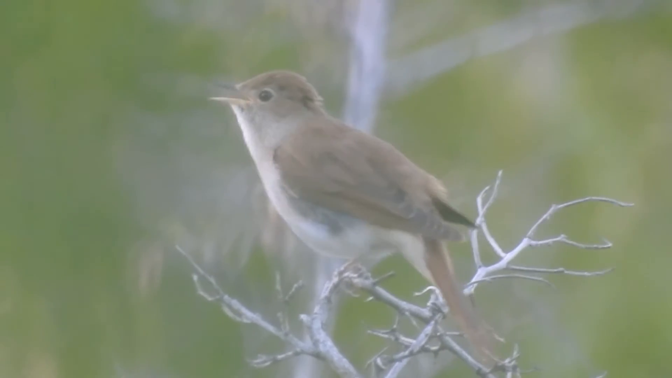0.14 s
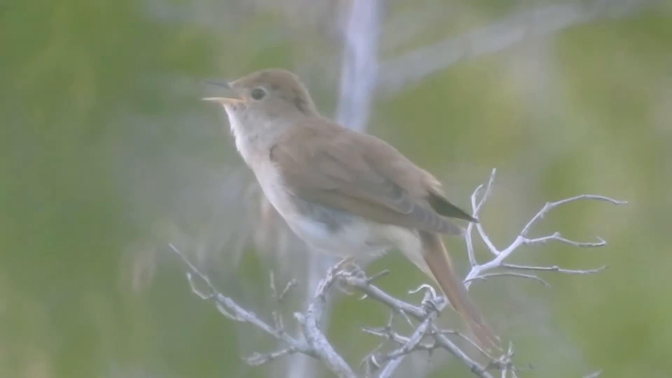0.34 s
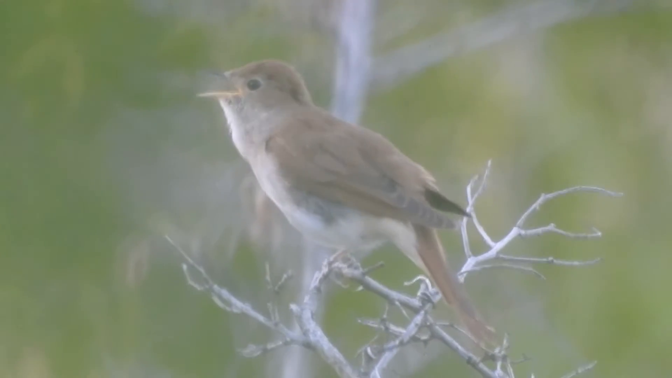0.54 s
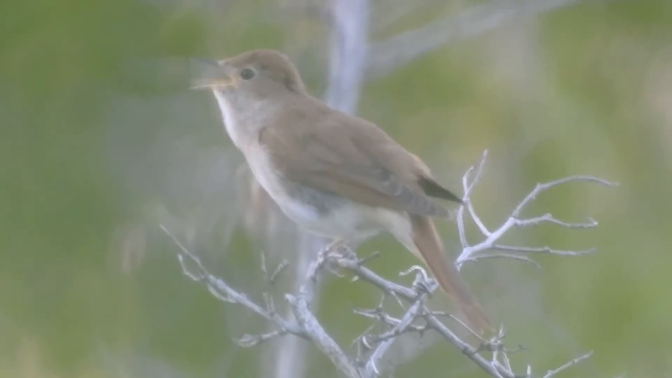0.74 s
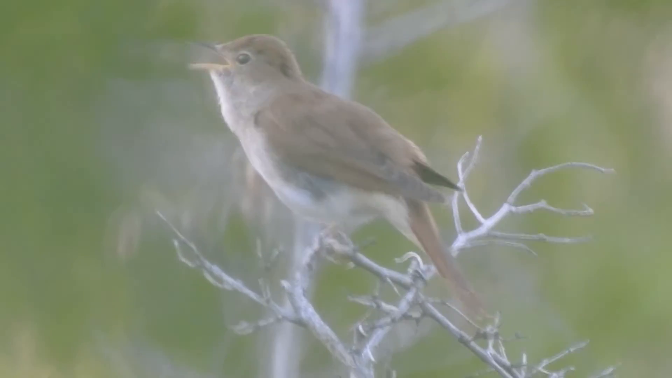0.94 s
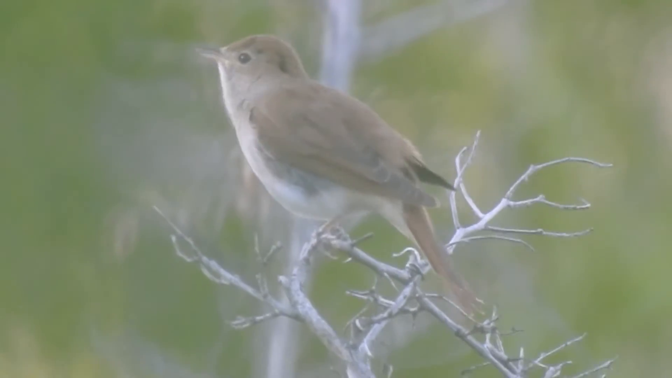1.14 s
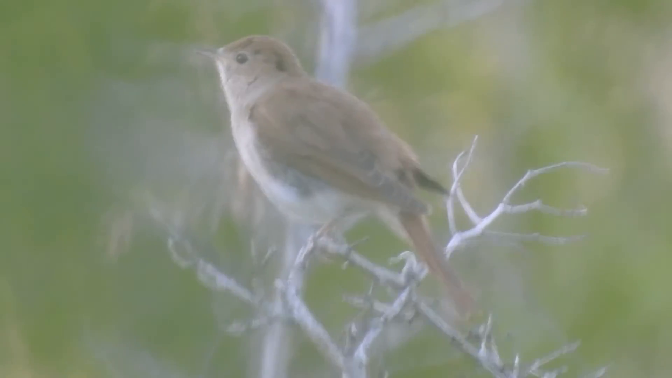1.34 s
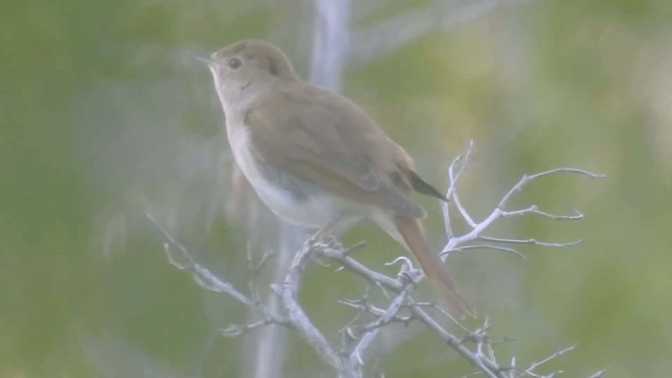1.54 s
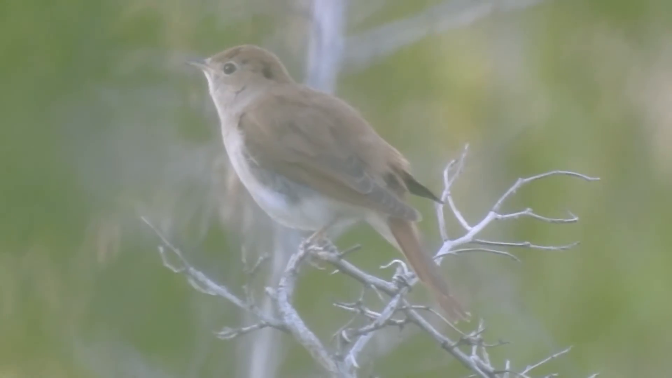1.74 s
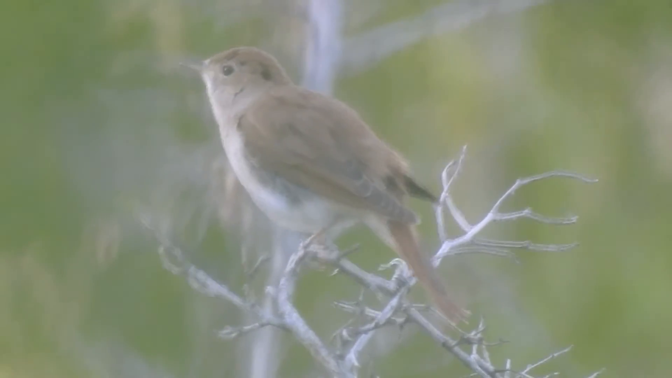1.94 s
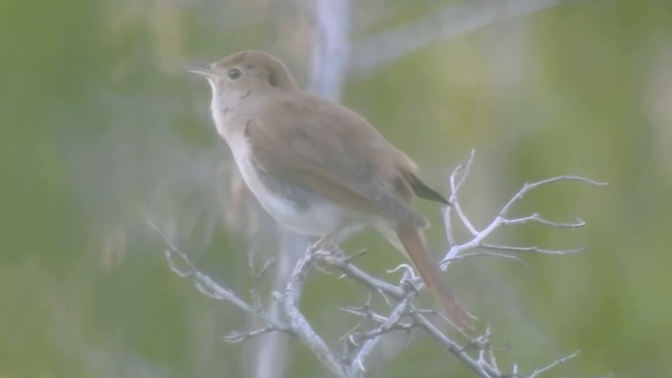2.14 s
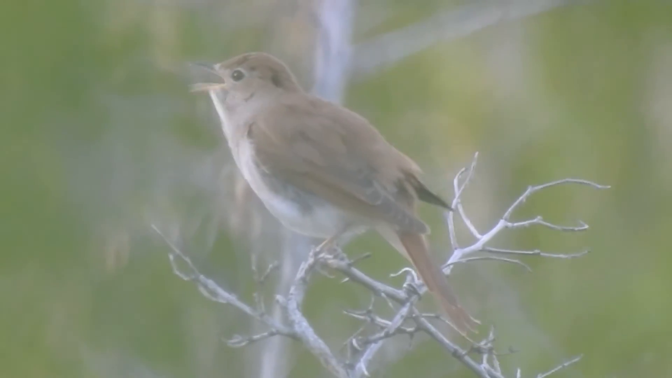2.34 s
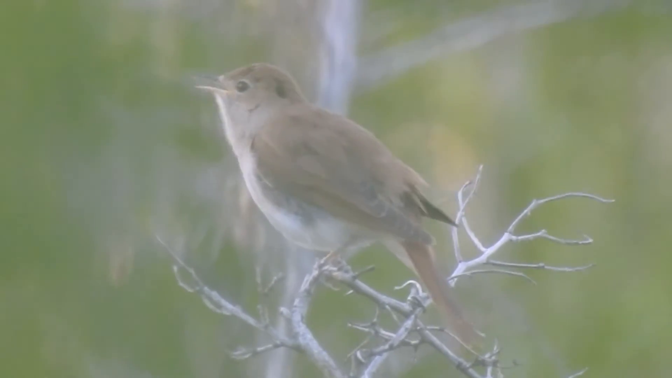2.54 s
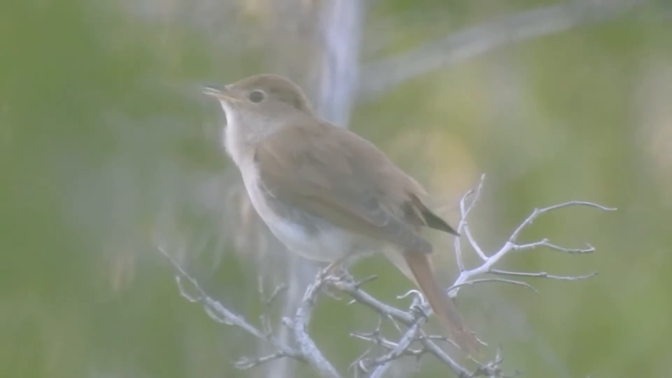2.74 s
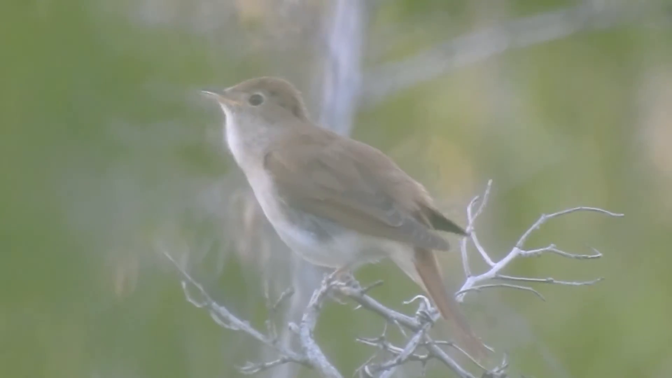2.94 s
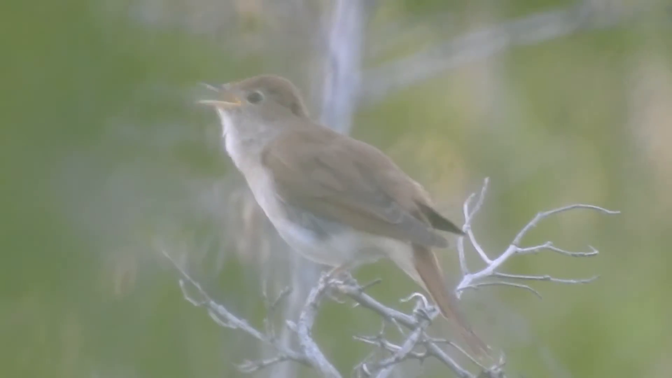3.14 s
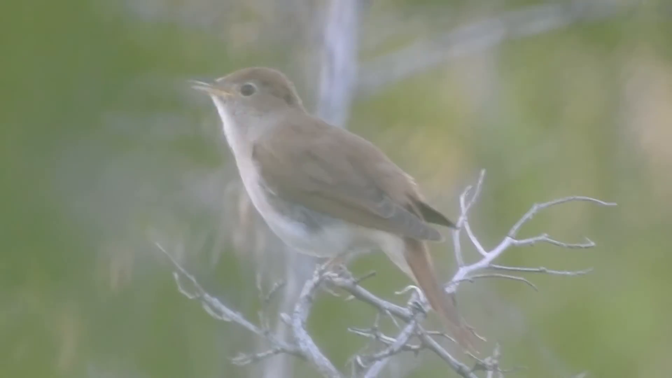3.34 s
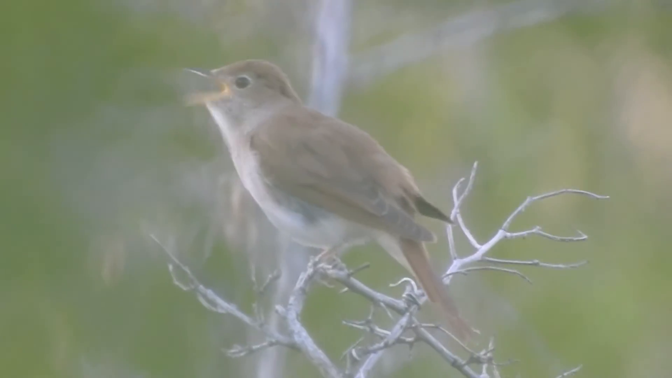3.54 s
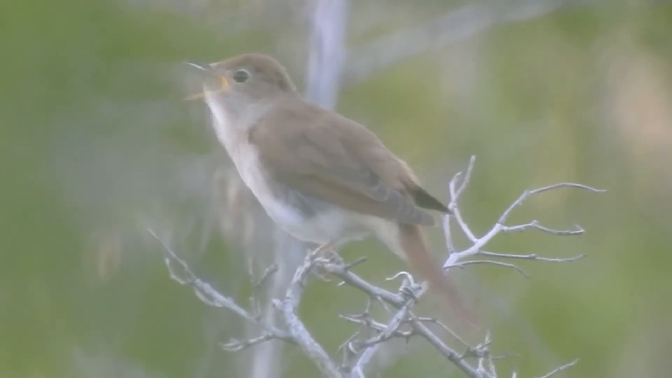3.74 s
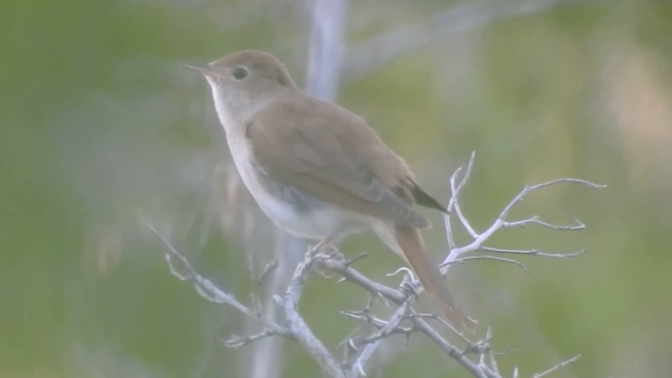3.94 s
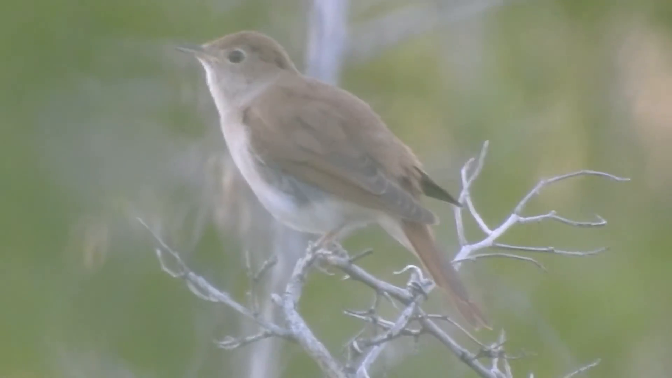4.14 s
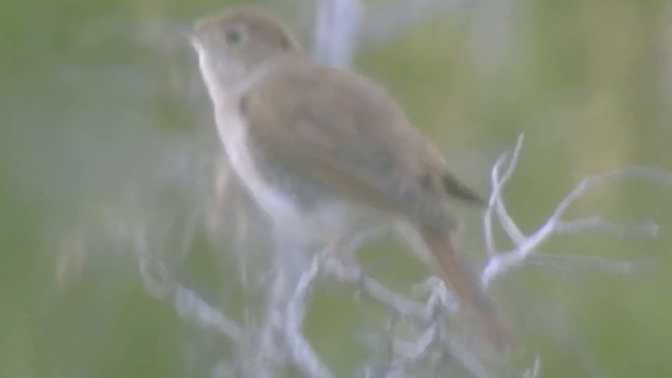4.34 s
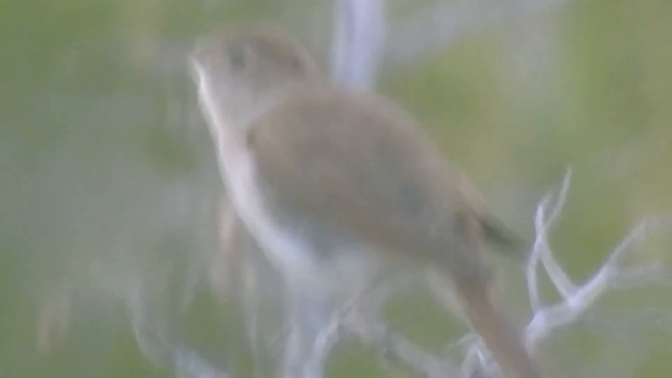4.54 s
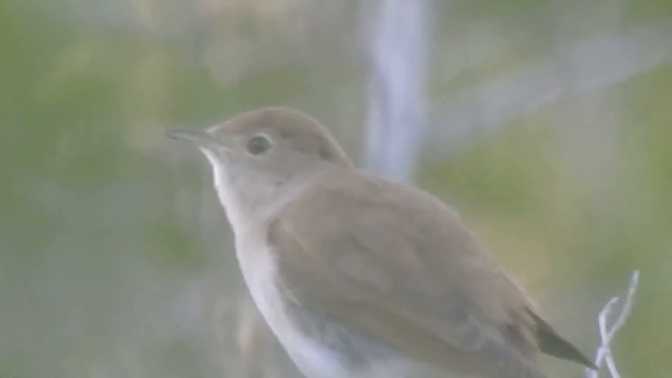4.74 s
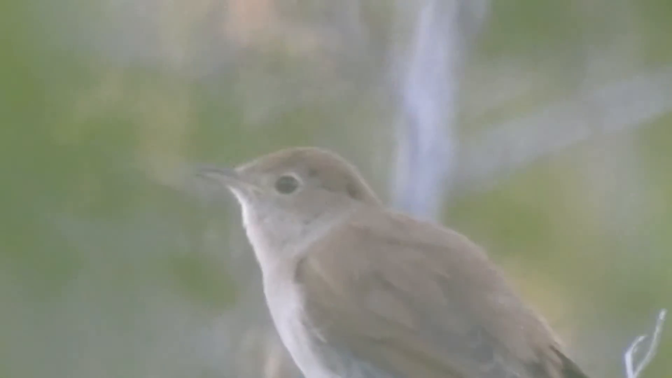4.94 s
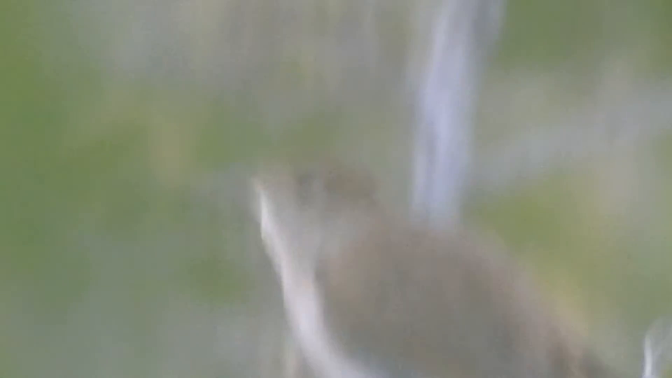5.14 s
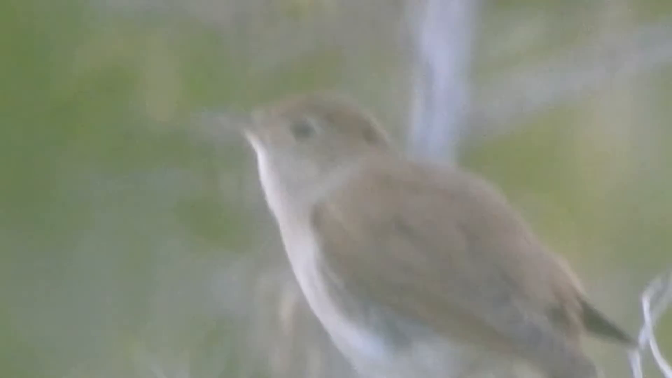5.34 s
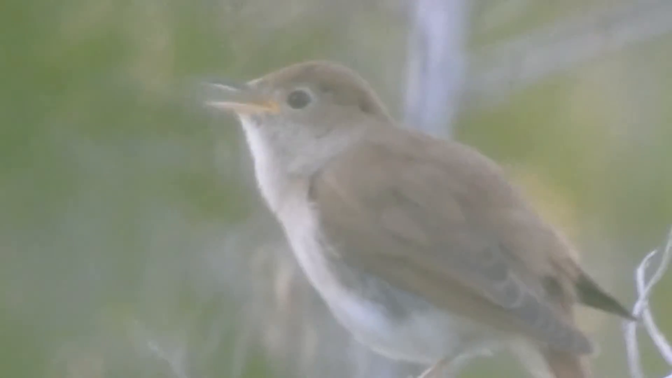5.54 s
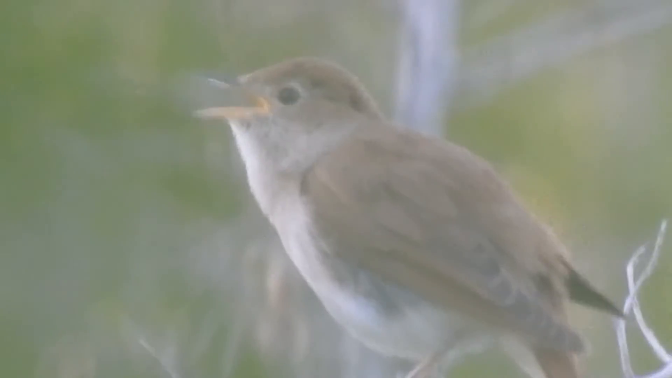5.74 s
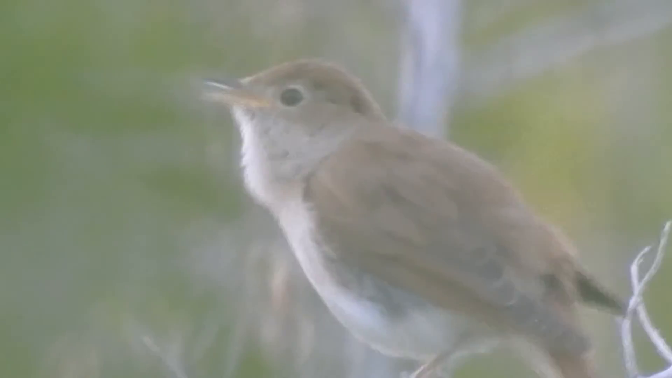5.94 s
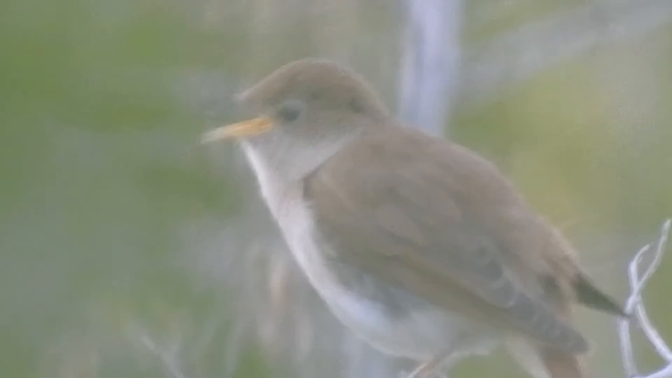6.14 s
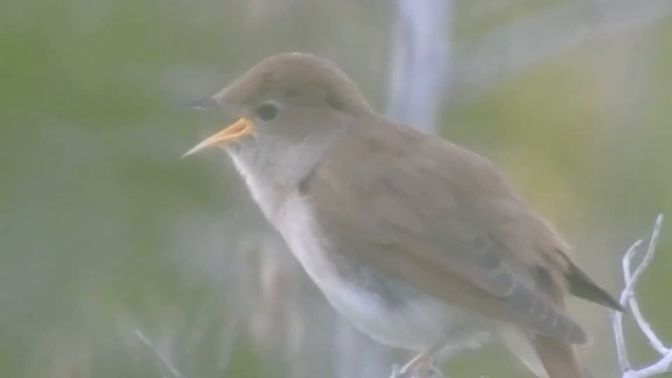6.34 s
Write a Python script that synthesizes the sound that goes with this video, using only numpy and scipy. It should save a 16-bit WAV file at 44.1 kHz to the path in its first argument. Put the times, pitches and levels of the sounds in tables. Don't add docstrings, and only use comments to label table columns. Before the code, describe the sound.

A nightingale sings close by at a wood's edge, dry and bright with a short leafy reverberation. At 0.05-0.12 s come rough high ticks, then a low rising chirp near 0.2. Four loud whip cracks fall at about 0.34, 0.57, 0.79 and 1.02 s, each followed by four quick, fading, descending trill notes. A raspy high flick sounds at 1.2; then a lull with pulsing crickets, soft snaps and, from 2.15 to 2.75, a faint distant repeated figure. Sharp high notes return at 2.4-2.8, two low soft whistles at 2.9-3.05, swooping chirps at 3.13-3.45, a rapid two-toned run at 3.52-3.6, a high downward glide at 3.65, and bright buzzy notes at 3.87-4.0. Afterwards it is quiet: cricket bouts, tiny snaps at 4.6 and 5.1, far fluttering whistles, then soft steady whistles at 5.6-6.0 and louder from 6.2 to the end. A low outdoor rumble and faint airy hiss persist.

```python
import sys
import numpy as np
from scipy import signal
from scipy.fft import rfft, irfft, next_fast_len
from scipy.io import wavfile
from scipy.ndimage import uniform_filter1d, map_coordinates

SR = 44100
rng = np.random.default_rng(int(sys.argv[2]) if len(sys.argv) > 2 else 0)


def store_pcm(level_fs):
    pcm = np.round(np.clip(level_fs, -1, 1) * 32767).astype(np.int16)
    wavfile.write(sys.argv[1], SR, np.atleast_2d(pcm).T)


def gain_from_db(level_db):
    decades = np.asarray(level_db, float) / 20
    return 10 ** decades


N = 285768


def unit(x):
    return x / np.sqrt(np.mean(x ** 2) + 1e-20)


def along(points, hz):
    f, v = np.transpose(points)
    return np.interp(np.log(hz + 1), np.log(f + 1), v)


def wobble(n, rate):
    knots = rng.standard_normal(int(n * rate / SR) + 4)
    return map_coordinates(knots, [np.arange(n) * rate / SR])


def filtered(x, response):
    m = next_fast_len(N + 8192)
    return irfft(rfft(x, m) * response(np.fft.rfftfreq(m, 1 / SR)), m)[..., :N]


def leaning(x, lean):
    return filtered(x, lambda hz: gain_from_db(along(lean, hz) * [[0.5], [-0.5]]))


def add(track, s, sound):
    part = track[round(s * SR):][:len(sound)]
    part += sound[:len(part)]


def tone(hz):
    return np.sin(2 * np.pi * np.cumsum(hz) / SR)


def syrinx(hz, overtone_db):
    lag = min(len(hz) // 4, round(0.009 * SR))
    late = np.pad(hz, (lag, 0), mode="edge")[:len(hz)]
    passed = gain_from_db(overtone_db - 3.3 * ((late - 3100) / 500) ** 2)
    second, third = tone(2 * late), tone(3 * late)
    return tone(hz) + passed * (second + gain_from_db(-17.5) * third)


def chirps(rows, lean=0.93):
    track = np.zeros(N)
    for s, ms, start, middle, end, db in rows:
        u = np.linspace(0, 1, round(ms * SR / 1000))
        slope = 4 * middle - 3 * start - end
        curve = 2 * (start + end - 2 * middle)
        hz = start + slope * u + curve * u * u
        point = 0.48 + 3.1 / ms
        puff = np.abs(np.sin(np.pi * u ** lean)) ** point
        add(track, s, gain_from_db(db) * puff * tone(hz))
    return track


def whistles(notes, overtone_db, waver_db, waver_rate, round_s, shake_hz=0):
    track = np.zeros(N)
    for note in notes:
        s, hz, db = np.transpose(note)
        t = np.arange(s[0], s[-1], 1 / SR)
        pitch = uniform_filter1d(np.interp(t, s, hz), int(round_s * SR) + 1, mode="nearest")
        pitch = pitch + shake_hz * wobble(len(t), waver_rate)
        edges = np.clip(np.minimum(t - s[0], s[-1] - t) / 0.0018, 0, 1)
        waver = gain_from_db(waver_db * wobble(len(t), waver_rate))
        size = np.interp(t, s, gain_from_db(db)) * edges * waver
        add(track, s[0], size * syrinx(pitch, overtone_db))
    return track


def struck(shapes, beat, times):
    return [(s + ms / 1000, *shape, db + more_db)
            for s, more_db in times for shape, (ms, db) in zip(shapes, beat)]


def bent(rows):
    return [(s, ms, start, start + 0.583 * (end - start), end, db) for s, ms, start, end, db in rows]


def again(shape, times):
    return [[(s + ms / 1000, hz, db) for ms, hz, db in shape] for s in times]


# f/Hz, level per Hz/dB
AIR_SPECTRUM = [(28, -29), (45, -3.5), (70, 4), (125, -4.5), (200, 1), (410, -7.5), (650, -6.5), (800, -12),
                (2700, -18.5), (4500, -16), (6560, -14.5), (8140, -28), (13600, -37), (15600, -40.5)]
# f/Hz, correlation [1]
AIR_COHERENCE = [(35, 0.95), (70, 0.76), (180, 0.88), (550, 0.92), (1650, 0.85), (4970, 0.068),
                 (15000, 0.08)]
# f/Hz, left minus right level/dB
AIR_LEAN = [(60, -1), (2000, -3), (8000, -1), (15000, 0.5)]


def air():
    z = signal.stft(rng.standard_normal((2, N)), nperseg=512)[2]
    patches = uniform_filter1d(rng.standard_normal(z.shape[1:]), 6, 0)
    patches = uniform_filter1d(patches, 14, 1)
    pair = signal.istft(z * gain_from_db(1.5 * unit(patches)), nperseg=512)[1][:, :N]

    def mid_side(hz):
        turn = np.arccos(np.clip(along(AIR_COHERENCE, hz), -1, 1)) / 2
        return gain_from_db(along(AIR_SPECTRUM, hz)) * [np.cos(turn), np.sin(turn)]

    mid, side = filtered(pair, mid_side)
    return gain_from_db(-44.5) * unit(leaning(np.array([mid + side, mid - side]), AIR_LEAN))


STROKE_FALL = (1.028, 0.925)

# t/s, centre f/Hz, level/dB
CHORUS_SWELL = [(0, 4420, -49), (1.25, 4440, -51.5), (1.4, 4525, -39.5), (1.52, 4640, -54),
                (1.65, 4410, -46.5), (1.78, 4390, -48), (1.85, 4560, -50), (1.95, 4600, -43),
                (2.08, 4320, -48.5), (2.2, 4500, -55.5), (3.6, 4520, -50), (4.1, 4500, -49.5),
                (4.5, 4550, -57.5), (5.5, 4524, -54.5), (6.48, 4600, -53)]


def cricket_chorus():
    high, low = STROKE_FALL
    when, centre_hz, level_db = np.transpose(CHORUS_SWELL)
    sides = []
    for luck in rng.random((2, 1500, 4)):
        starts = luck[:, 0] * (N / SR - 0.03)
        swell_db = np.interp(starts, when, level_db) + 5 * (luck[:, 1] - 0.8)
        pitch = np.interp(starts, when, centre_hz) + 280 * (luck[:, 2] - luck[:, 3])
        strokes = zip(starts, pitch, swell_db)
        sides.append(chirps([(s, 18, high * hz, hz, low * hz, db) for s, hz, db in strokes]))
    return np.array(sides) * gain_from_db([[-1.1], [1.1]])


# t/s, f/Hz, peak level/dB
WARBLES = [
    [(5.725, 2800, -49), (5.75, 2865, -45), (5.82, 2686, -50), (5.9, 2555, -45), (5.94, 2458, -39),
     (5.99, 2367, -45.5)],
    [(5.73, 2450, -49), (5.79, 2423, -40), (5.85, 2306, -37), (5.9, 2240, -60)],
    [(6.36, 1792, -54), (6.478, 1874, -47.5)],
    [(6.345, 2150, -54), (6.42, 2113, -48), (6.478, 2150, -52)],
    [(6.222, 2120, -49), (6.255, 2250, -57)],
    [(6.36, 1365, -61), (6.478, 1510, -55)],
    [(5.815, 4710, -51), (5.86, 4390, -53), (5.96, 4490, -49.5)],
    [(0.004, 3150, -56), (0.05, 3200, -53), (0.13, 3150, -55)],
    [(1.47, 2070, -56), (1.56, 2050, -62)],
    [(1.55, 2485, -54.5), (1.65, 2410, -59)],
    [(1.94, 1950, -59.5), (2.09, 2130, -65)],
]


def far_warbles():
    paths = [whistles(WARBLES, -60, waver_db=5, waver_rate=110, round_s=0.01, shake_hz=90) for _ in range(2)]
    return 0.71 * (paths[0] + paths[1])


# t/s, f/Hz, peak level/dB
THREADS = [
    [(0.02, 2450, -59), (0.17, 2464, -58)],
    [(2.235, 3130, -57), (2.33, 3130, -59), (2.41, 3040, -58)],
    [(2.25, 2610, -57), (2.55, 2600, -58), (2.86, 2600, -59)],
    [(5.67, 4970, -53), (5.8, 4900, -58), (5.9, 4920, -55)],
    [(5.695, 2284, -49), (5.73, 2164, -51), (5.79, 2034, -49)],
    [(5.85, 1680, -59), (5.92, 1680, -55.5)],
    [(6.235, 1690, -52), (6.33, 1770, -53), (6.4, 1800, -54)],
    [(6.35, 3090, -58), (6.4, 3090, -53), (6.478, 3080, -52)],
    [(5.255, 2850, -52), (5.29, 2900, -53), (5.33, 2850, -58)],
    [(4.0, 2950, -50), (4.06, 2500, -52)],
]


def distant_threads():
    return whistles(THREADS, -60, waver_db=5, waver_rate=70, round_s=0.01, shake_hz=35)


# t/s, length/ms, centre f/Hz, pulse rate/Hz, peak level/dB
TICKS = [
    (0.045, 5.6, 5270, 1240, -18),
    (0.07, 5.3, 6540, 1100, -22),
    (0.0939, 7.2, 6270, 780, -14.5),
    (0.121, 5.8, 6220, 930, -17.5),
]


def ticks():
    track = np.zeros(N)
    for s, ms, hz, rate, db in TICKS:
        t = np.arange(round(ms * SR / 1000)) / SR
        pulses = np.abs(np.sin(np.pi * rate * t)) ** 2.1 * gain_from_db(2.3 * wobble(len(t), 1460))
        puff = np.abs(np.sin(np.pi * (t / t[-1]) ** 0.31))
        add(track, s, gain_from_db(db) * puff * pulses * tone(hz + 800 * wobble(len(t), 990)))
    return filtered(track, lambda hz: 1 / (1 + (hz / 7900) ** 30) / (1 + (4000 / (hz + 1)) ** 12))


# t/s, length/ms, start f/Hz, end f/Hz, peak level/dB
FLICKS = [(1.2044, 21, 3370, 4140, -43.5), (1.2117, 39, 2750, 3190, -39), (1.2189, 17.5, 6060, 7550, -23),
          (1.2199, 34, 5320, 6180, -25.5), (1.223, 23, 3830, 4930, -34), (1.239, 25.5, 4800, 5430, -26),
          (1.2366, 17, 6150, 6950, -31.5), (2.4812, 5.1, 3770, 3810, -27), (2.4856, 9.1, 5980, 3420, -28),
          (3.1244, 6.1, 3200, 4200, -24), (3.1312, 10.5, 4050, 6330, -18.5), (3.41, 10, 3670, 4000, -27),
          (3.4151, 7.5, 5270, 6250, -28), (3.4173, 13, 4300, 5760, -27.5), (3.4206, 11.6, 3670, 4120, -29),
          (3.8781, 7, 3980, 4760, -21), (3.9679, 6.6, 3380, 3970, -31), (3.952, 12, 2900, 3100, -35),
          (3.9835, 6, 4300, 5600, -23), (0.06, 4.7, 3900, 3200, -38), (0.085, 5, 3900, 3100, -40),
          (0.112, 5.5, 3900, 3200, -41), (0.522, 5, 4600, 3900, -37), (0.531, 5, 4600, 3900, -37),
          (0.54, 5, 4520, 3910, -38), (3.9815, 6.8, 3660, 5100, -26.5), (3.982, 9.1, 4990, 7500, -16),
          (3.988, 9.4, 7500, 8560, -36), (3.9945, 5.3, 6000, 6200, -30), (3.989, 4, 6000, 6200, -28),
          (3.866, 4, 3500, 3880, -35)]


def flicks():
    return chirps(bent(FLICKS)) * gain_from_db(2.2 * wobble(N, 600))


# t/s, length/ms, start f/Hz, end f/Hz, peak level/dB
FAR_NOTES = [(6.6, 18, 4370, 4830, -41), (5.643, 33, 5140, 4820, -41.5), (5.915, 27, 5350, 4500, -41.5),
             (4.9, 19, 4500, 4420, -44), (5.893, 30, 5850, 6100, -47), (5.912, 12, 5400, 5000, -47),
             (0.186, 6.5, 4400, 3750, -36), (0.194, 7.9, 4000, 3660, -35), (0.189, 6.2, 3150, 3100, -35),
             (0.13, 24, 4000, 4420, -40), (2.88, 20, 3250, 3150, -46.5), (1.955, 28, 3900, 3800, -49.5),
             (0.298, 10, 2900, 3050, -35), (6.086, 29, 4700, 5070, -37.5), (6.315, 36, 5110, 5370, -40.5),
             (6.34, 24, 5350, 4580, -33.5), (6.341, 14, 2100, 1930, -39), (6.37, 14, 2180, 2060, -34),
             (6.398, 14, 2050, 1910, -36.5), (5.9, 15, 2400, 2010, -35)]


def far_notes():
    return chirps(bent(FAR_NOTES))


# t/s, f/Hz, peak level/dB
RISES = [
    [(0.164, 3880, -37), (0.175, 4320, -37), (0.184, 4460, -27), (0.19, 4400, -40)],
    [(0.181, 2170, -25), (0.19, 2010, -23.5), (0.203, 1798, -37), (0.22, 2310, -23), (0.235, 2674, -18.5),
     (0.249, 2744, -22), (0.253, 2750, -44)],
    [(2.396, 4250, -37.5), (2.43, 4560, -40.5), (2.465, 4880, -33.5), (2.482, 5460, -23.5),
     (2.488, 5730, -31)],
    [(2.728, 6600, -49), (2.753, 8050, -42)],
    [(2.83, 7700, -37), (2.843, 7950, -41)],
]
# t/s, f/Hz, peak level/dB; the last is thin
SWOOPS = [
    [(3.134, 4270, -36), (3.139, 3660, -15), (3.145, 2883, -21.5), (3.166, 3475, -18), (3.178, 2970, -24.5),
     (3.192, 1990, -39)],
    [(3.256, 1700, -52), (3.274, 2200, -27), (3.281, 1983, -28.5), (3.3, 2614, -20.5), (3.318, 2836, -17.5),
     (3.332, 2470, -24.5), (3.344, 1750, -29)],
    [(3.743, 2260, -33), (3.755, 2524, -25), (3.771, 2436, -25), (3.778, 1630, -34), (3.788, 1960, -28.5),
     (3.8, 2800, -20.5), (3.812, 3090, -19), (3.823, 3030, -42)],
]
DIP = [(-22.5, 7850, -35), (-13, 7200, -32), (-9.5, 7000, -24.5), (1.5, 6720, -18), (10, 7120, -22),
       (12.5, 7350, -33), (19.5, 7000, -32)]
DIP_TIMES = [2.775, 2.8135]


def full_notes():
    notes = RISES + SWOOPS[:-1] + again(DIP, DIP_TIMES)
    return whistles(notes, -19.5, waver_db=1.5, waver_rate=146, round_s=0.0062)


# t/s, peak level/dB, pitch over the usual [1]
WHIPS = [
    (0.3414, -9.5, 1.024),
    (0.5713, -10, 0.99),
    (0.7932, -12, .98),
    (1.016, -12, 0.96),
]
# t from the whip/ms, f/Hz, peak level/dB
ARC = [(-15, 11500, -60), (-15.5, 13800, -53), (-4.5, 12900, -44), (1.5, 10900, -40), (7.5, 6700, -53)]
# t/s, f/Hz, peak level/dB
DROPS = [
    [(3.138, 4110, -20), (3.144, 4470, -12), (3.1495, 4000, -20)],
    [(3.416, 2544, -44), (3.424, 2810, -22), (3.432, 2420, -25.5), (3.444, 1300, -36)],
    [(3.638, 8700, -43), (3.65, 7820, -34), (3.67, 6990, -19), (3.686, 6460, -20)],
    [(3.871, 3440, -28), (3.88, 3093, -19), (3.888, 2306, -24), (3.897, 1270, -41)],
]


def thin_notes():
    arcs = again(ARC, [s for s, *_ in WHIPS])
    return whistles(arcs + DROPS + SWOOPS[-1:], -60, waver_db=0.0, waver_rate=27, round_s=0.0084)


# length/ms, start f/Hz, middle f/Hz, end f/Hz
WHIP_SHAPES = [(4.8, 4130, 3720, 2900), (6.4, 7140, 5570, 3600)]
WHIP_BEAT = [(-5.5, -10), (0.5, -1)]


def whips():
    rows = [(s + ms / 1000, long, high * start, high * middle, end, db + more_db)
            for s, more_db, high in WHIPS
            for (long, start, middle, end), (ms, db) in zip(WHIP_SHAPES, WHIP_BEAT)]
    return chirps(rows) * gain_from_db(wobble(N, 500))


# t/s, length/ms, lowest f/Hz, peak level/dB
HOOKS = [(.344, 19.6, 2390, -25), (0.573, 18.5, 2510, -24.5), (0.795, 17, 2373, -23),
         (1.022, 23.7, 2297, -25.5)]


def hooks():
    rows = [(s, ms, 1.22 * hz, hz, 1.07 * hz, db) for s, ms, hz, db in HOOKS]
    return chirps(rows, lean=0.68) * gain_from_db(1.5 * wobble(N, 200))


# t/s, length/ms, start f/Hz, end f/Hz, peak level/dB
TRILL = [(0.3758, 14.2, 3280, 2535, -17.5), (0.4029, 16, 3290, 2306, -22), (0.4286, 21.6, 3197, 2194, -23),
         (.456, 20, 2980, 2240, -28), (0.5982, 16, 3227, 2540, -17), (0.6253, 19.3, 3390, 2200, -23),
         (0.655, 14.3, 3244, 2250, -25), (0.683, 14, 3300, 2570, -27), (.8213, 14, 3530, 2506, -17),
         (0.8505, 13.5, 3410, 2335, -21.5), (0.8748, 20, 3393, 2204, -24), (.903, 20, 3045, 2230, -30),
         (1.0448, 16.6, 2860, 2250, -24.5), (1.0695, 21.5, 2794, 2244, -23.5),
         (1.0952, 22.5, 3000, 2270, -24), (1.1233, 17, 2970, 2360, -28)]


def trills():
    rows = [(s, ms, top, top + 0.681 * (end - top), end, db) for s, ms, top, end, db in TRILL]
    return chirps(rows, lean=0.74) * gain_from_db(1.5 * wobble(N, 200))


# first stroke t/s, last stroke t/s, level of the last/dB
HIGH_BOUTS = [(0.364, 0.472, -42.5), (0.861, .957, -41.5), (1.33, 1.464, -43.5), (1.847, 1.978, -44),
              (2.303, 2.426, -42), (2.8, 2.935, -40), (3.345, 3.496, -43), (4.275, 4.416, -43.5),
              (4.475, 4.624, -46), (4.702, 4.752, -52), (4.795, 4.93, -42.5), (5.114, 5.208, -51.5),
              (5.237, 5.374, -45.5), (4.023, 4.119, -50), (2.98, 3.092, -44)]
# first stroke t/s, last stroke t/s, level of the last/dB
LOW_BOUTS = [(0.637, 0.68, -40), (1.988, 2.107, -44), (2.52, 2.564, -40), (4.174, 4.253, -42.5),
             (4.923, 5.001, -43.5), (5.407, 5.534, -44.5), (5.823, 5.982, -49)]


def near_crickets():
    stroke_s, stroke_ms, grow_db = 0.046, 21.4, 3.5
    high, low = STROKE_FALL
    strokes = []
    bouts = [(4600, *row) for row in HIGH_BOUTS] + [(4400, *row) for row in LOW_BOUTS]
    for (hz, first, last, db), luck in zip(bouts, rng.standard_normal((len(bouts), 8, 2))):
        grow = np.linspace(0, 1, round((last - first) / stroke_s) + 1)
        for u, f, size in zip(grow, hz + 35 * luck[:, 0], luck[:, 1]):
            s = first + u * (last - first) - 0.006
            level_db = db - grow_db * (1 - u) + 1.6 * size
            strokes.append((s, stroke_ms, high * f, f, low * f, level_db))
    return chirps(strokes)


# start t/s, end t/s, start f/Hz, end f/Hz, peak level/dB
SEEPS = [(0.673, 0.795, 7180, 6420, -43), (0.952, 1, 7400, 6140, -44.5), (3.413, 3.539, 6900, 6480, -42.5),
         (6.025, 6.112, 6970, 6250, -47.5)]
# share of its time [1], share of its fall [1], level/dB
SEEP_COURSE = [(0, 0, -6), (.25, 0.58, 0), (1, 0.98, -2.5)]


def far_seeps():
    calls = [[(s + u * (end - s), hz + fall * (to_hz - hz), db + less_db) for u, fall, less_db in SEEP_COURSE]
             for s, end, hz, to_hz, db in SEEPS]
    return whistles(calls, -61, waver_db=2.0, waver_rate=62.9, round_s=0.017, shake_hz=17.8)


# t/s, peak level/dB, centre f/Hz, width/Hz, t60/s
CRACKS = [(1.51, -38, 900, 1490, 0.33), (1.648, -35.5, 1000, 1700, 0.21), (1.708, -38, 1900, 2500, 0.022),
          (1.716, -33.5, 5560, 2500, 0.021), (2.559, -38, 3600, 2000, .012),
          (2.64, -32.5, 4000, 2500, .012), (2.652, -37, 5000, 3010, .02), (3.796, -34.5, 900, 900, 0.012),
          (3.806, -25, 5070, 2500, 0.024), (4.624, -27, 1220, 1300, 0.034), (3.796, -36, 190, 200, 0.089),
          (4.6348, -29.5, 5000, 3020, 0.028), (5.098, -35, 910, 600, .04), (5.105, -39, 4330, 1500, .015),
          (6.076, -34, 2720, 2010, 0.035)]


def snaps():
    track = np.zeros(N)
    t = np.arange(SR // 10) / SR
    for s, db, hz, width, t60 in CRACKS:
        b, a = signal.iirpeak(hz, hz / width, SR)
        puff = rng.standard_normal(len(t)) * gain_from_db(-60 * t / t60)
        crack = signal.lfilter(b, a, signal.lfilter(b, a, puff))
        add(track, s, gain_from_db(db) * crack / np.abs(crack).max())
    return track


# length/ms, start f/Hz, middle f/Hz, end f/Hz
FIGURE = [
    (26.7, 1760, 1570, 1280),
    (27.3, 1990, 2150, 2530),
    (26.1, 2600, 2050, 1540),
    (34, 2560, 2630, 2540),
]
# t/ms, peak level/dB
FIGURE_BEAT = [(-63.5, -42.5), (0, -36), (29, -37), (13, -40)]
# t/s, level/dB
REPEATS = [(2.207, -2), (2.374, 0.77), (2.541, -0.52), (2.708, -0.86)]


def far_figures():
    echoes = [(s + 0.064, db - 11.5) for s, db in REPEATS]
    return chirps(struck(FIGURE, FIGURE_BEAT, REPEATS + echoes)) * gain_from_db(3 * wobble(N, 130))


HUMP = [(0, 1450, -35), (12.9, 1670, -32), (35.5, 1770, -30), (53.6, 1350, -37)]
HUMP_TIMES = [2.903, 3.012]


def humps():
    return whistles(again(HUMP, HUMP_TIMES), -40, waver_db=-0.5, waver_rate=120, round_s=0.0051)


# t/s, low f/Hz, low level/dB, high f/Hz, high level/dB
DUET = [(3.525, 5760, -23.5, 7220, -21.5), (3.546, 5660, -30, 7700, -25.5), (3.566, 5590, -24, 7670, -27.5),
        (3.587, 5420, -30, 7920, -30.5)]


def duets():
    sides = [(11.4, 1.14, 0.94), (14.7, 1.09, 0.95)]
    rows = [(s, ms, start * hz, hz, end * hz, db) for s, *voices in DUET
            for (ms, start, end), (hz, db) in zip(sides, np.reshape(voices, (2, 2)))]
    octave = [(s, ms, 2 * a, 2 * b, 2 * c, db - 36) for s, ms, a, b, c, db in rows[::2]]
    return chirps(rows + octave)


# t/s, f/Hz, peak level/dB
BUZZ = [
    (3.951, 5260, -45),
    (3.964, 5750, -23.5),
    (3.975, 6250, -20.5),
    (3.98, 6900, -24.5),
    (3.985, 9300, -45),
]


def buzz():
    beat = 2 * np.pi * np.cumsum(520 + 70 * wobble(N, 300)) / SR
    flutter = 1 + 0.3 * np.cos(beat) + 0.15 * np.cos(2 * beat)
    under = [(s, 0.9 * hz, db - 2) for s, hz, db in BUZZ]
    return flutter * whistles([BUZZ, under], -55, waver_db=0.5, waver_rate=260, round_s=0.003)


# t/s, f/Hz, peak level/dB
FAR_WHISTLES = [
    [(4.873, 2050, -55), (4.93, 2127, -34), (4.99, 2313, -36.5), (5.04, 2238, -34.5), (5.1, 1986, -41.5),
     (5.19, 2003, -69)],
    [(5.22, 2953, -42), (5.25, 2816, -42.5), (5.275, 2114, -39.5), (5.31, 1620, -43)],
    [(5.39, 2000, -42), (5.43, 2002, -42), (5.48, 1993, -32), (5.55, 2087, -41), (5.59, 2030, -72)],
    [(5.77, 7050, -56), (5.825, 6580, -50), (5.895, 6140, -47)],
    [(6.14, 6320, -42), (6.185, 6830, -51), (6.222, 5820, -35)],
    [(5.375, 2090, -43), (5.42, 2204, -43), (5.47, 2190, -47)],
]


def far_whistles():
    return whistles(FAR_WHISTLES, -61, waver_db=2.0, waver_rate=62.9, round_s=0.017, shake_hz=17.8)


# t/s, f/Hz, peak level/dB
SOFT = [
    [(5.59, 3220, -54), (5.625, 3210, -50), (5.655, 3340, -42), (5.73, 3407, -35.5), (5.82, 3380, -34.5),
     (5.945, 3490, -32.5), (5.96, 3480, -42), (6.0, 3460, -55)],
    [(6.2, 3540, -45), (6.225, 3574, -37), (6.33, 3494, -29.5), (6.39, 3430, -28.5), (6.42, 3520, -27.5),
     (6.478, 3554, -26.5)],
]


def soft_whistles():
    return whistles(SOFT, -23.5, waver_db=0.0, waver_rate=24.0, round_s=0.016)


# f/Hz, level/dB
HISS = [(2800, -62), (3200, -1), (8000, 6), (11000, -7), (14000, -12), (14500, -60)]


def nightingale():
    rasp = whips() + flicks() + buzz() + ticks()
    hiss = filtered(rng.standard_normal(N), lambda hz: gain_from_db(along(HISS, hz)))
    breath = gain_from_db(-22.0) * np.abs(rasp) * hiss
    clean = trills() + hooks() + duets()
    return rasp + clean + breath + full_notes() + thin_notes()


def far_birds():
    long = far_whistles() + far_seeps() + distant_threads()
    return long + far_warbles() + far_notes() + far_figures()


# f/Hz, t60/s
TREE_DECAY = [(1500, 0.12), (4000, 0.12), (9000, 0.11)]


def trees(x, late_db):
    hz, t, z = signal.stft(rng.standard_normal((2, SR)), SR, nperseg=256)
    fall_db = -60 * t / along(TREE_DECAY, hz)[:, None]
    dull_db = -3 * np.log2(np.maximum(hz, 3000) / 3000)[:, None]
    decay = gain_from_db(fall_db) + gain_from_db(late_db + dull_db + 0.093 * fall_db)
    tail = signal.istft(z * decay, SR, nperseg=256)[1]
    tail = tail + 0.57 * tail[::-1]
    tail = tail / np.linalg.norm(tail[0])
    return signal.fftconvolve(np.pad(x, (200, 0))[None], tail, axes=1)[:, :N]


def echoed(x):
    late = np.pad(x, (round(0.052 * SR), 0))[:N]
    return x + gain_from_db(-29) * filtered(late, lambda hz: 1 / (1 + (hz / 3600) ** 6))


def crickets():
    near = near_crickets()
    wet = gain_from_db(-9) * trees(near, late_db=-20.0)
    return wet + near * gain_from_db([[-1.9], [1.9]]) + cricket_chorus()


# f/Hz, left minus right level/dB
SINGER_LEAN = [(3000, -.5), (6500, -4), (10000, 0.5)]


def scene():
    bird, far = nightingale(), far_birds()
    soft = soft_whistles() + humps()
    direct = leaning(echoed(bird), SINGER_LEAN)
    near = direct + gain_from_db(-11.5) * trees(bird + 0.9 * soft, late_db=-10.0)
    side = far + soft
    others = np.array([np.roll(side, shift=1), side]) * gain_from_db([[-1.6], [1.6]])
    others = others + gain_from_db(-3.0) * trees(far, late_db=-13.5)
    return near + others + crickets() + snaps() * gain_from_db([[-0.6], [0.6]]) + air()


def top_cut(x):
    return signal.sosfilt(signal.butter(12, 15670, fs=SR, output="sos"), x)


def record(dry):
    mix = filtered(dry, lambda hz: (hz < 15660) * gain_from_db(-6.0 * (hz > 15000)))
    return top_cut(mix)


dry = scene()
out = record(dry)
store_pcm(out)
```